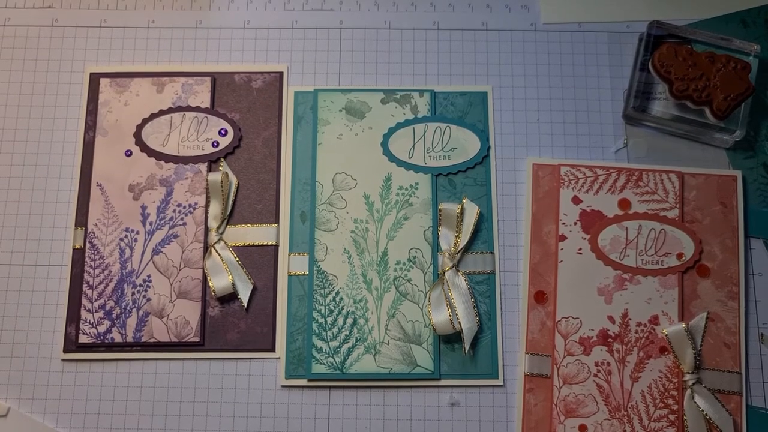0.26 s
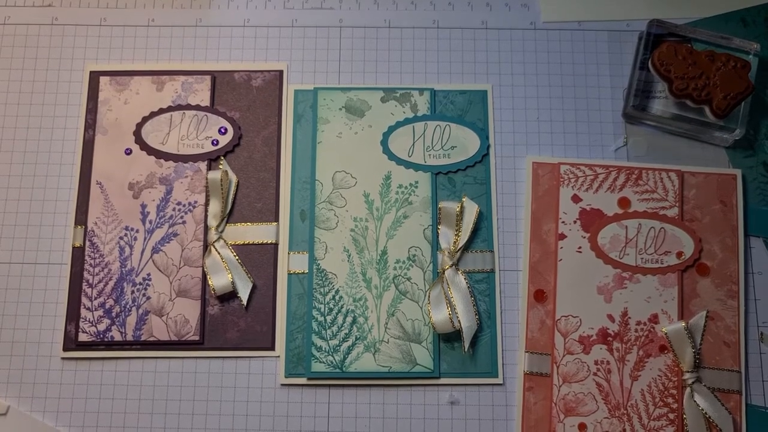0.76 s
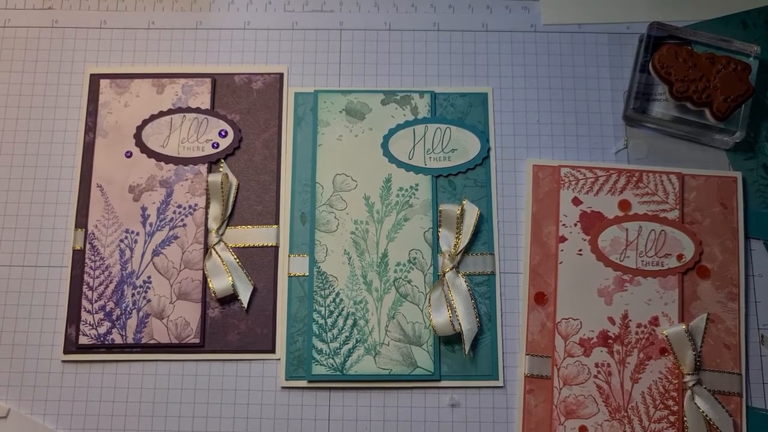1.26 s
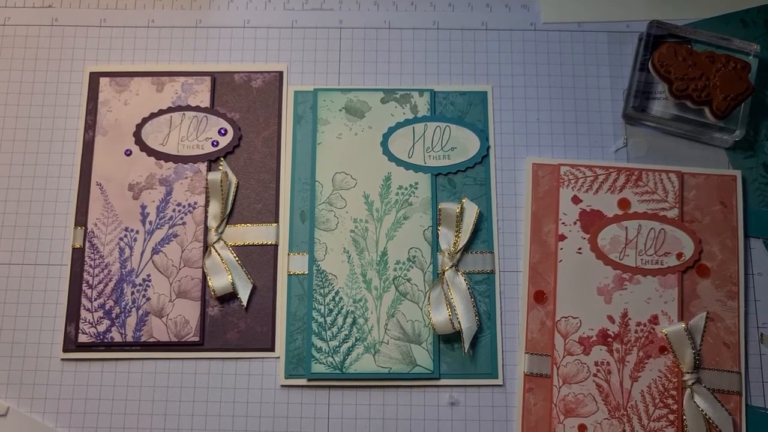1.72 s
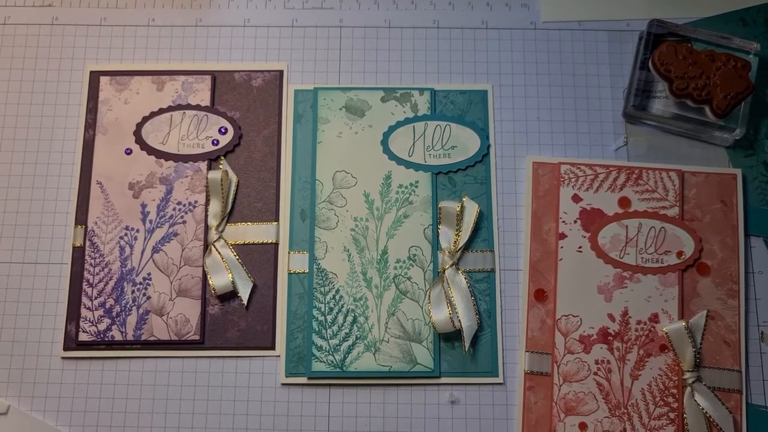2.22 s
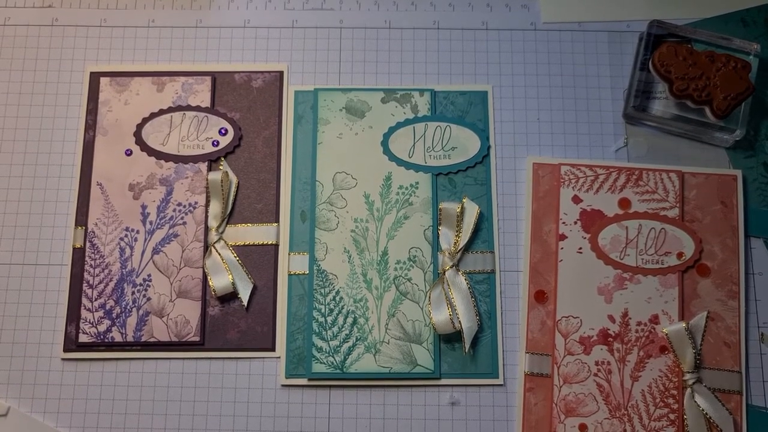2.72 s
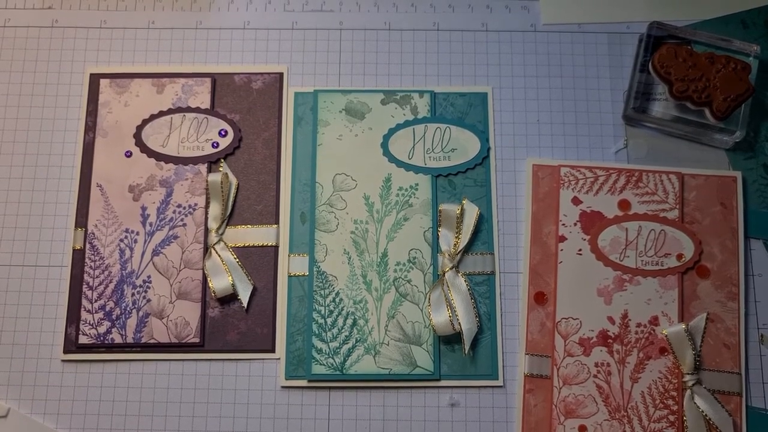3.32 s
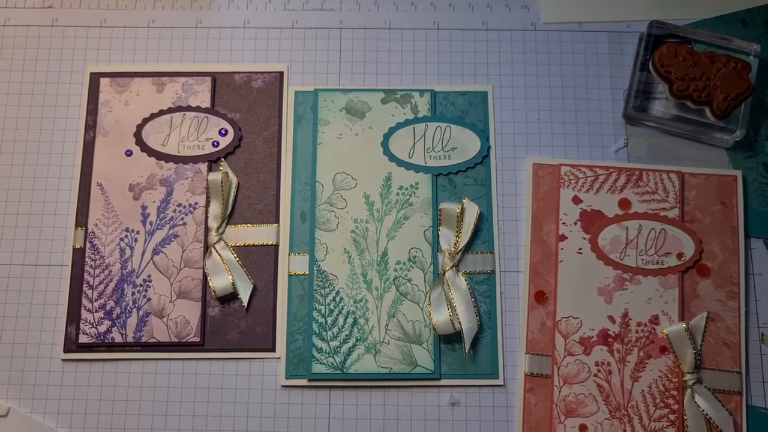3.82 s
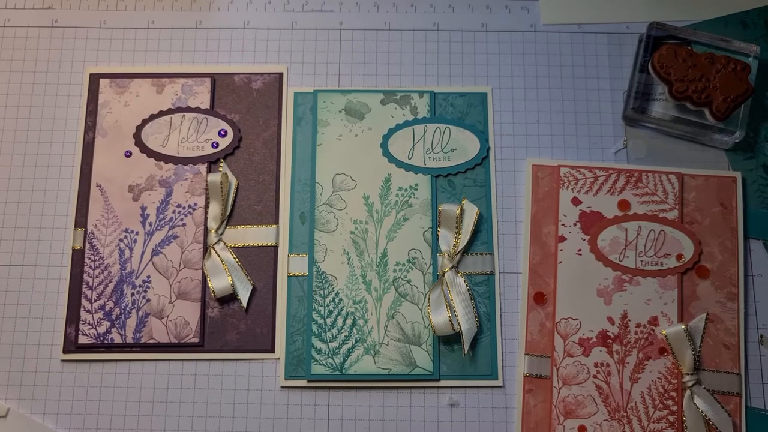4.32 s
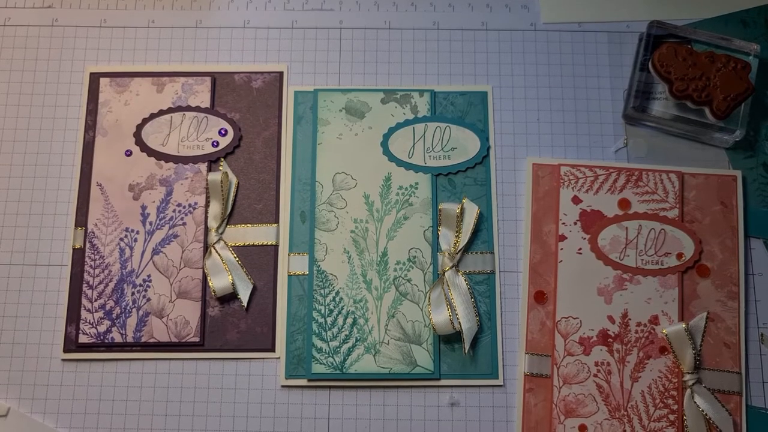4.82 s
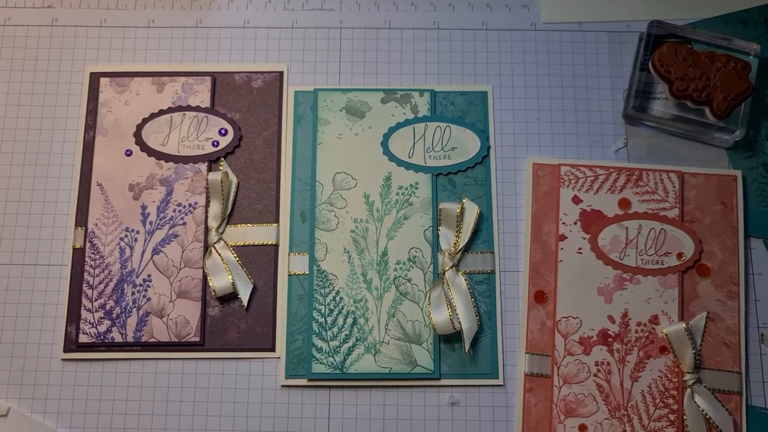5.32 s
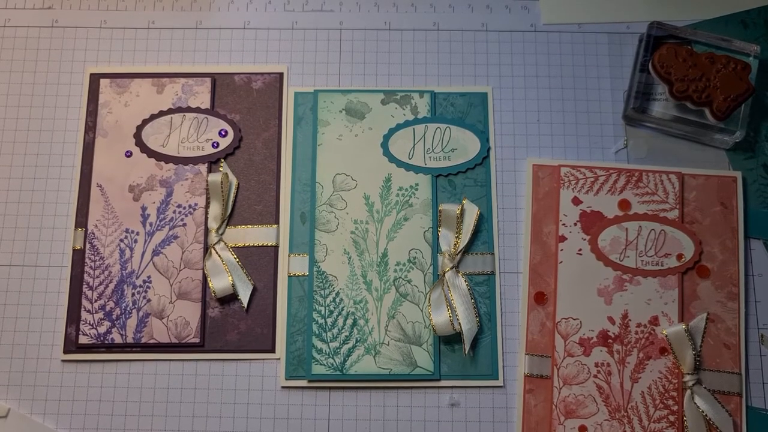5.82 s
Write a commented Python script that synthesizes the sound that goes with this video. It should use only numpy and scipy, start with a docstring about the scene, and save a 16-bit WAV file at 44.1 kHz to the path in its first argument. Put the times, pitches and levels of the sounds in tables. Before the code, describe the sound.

In a small room with a faint low hum, craft supplies are handled close to two microphones, slightly left of centre. From 0 to 1.1 seconds, light scrapes, plastic clicks and cardboard knocks come in loose clusters, strongest near 0.5 and 0.9, with soft hollow taps near 0.8 and 1.0. It is nearly quiet until 1.9, then small clicks and bumps gather around 2.2. From 2.8 a box drags and thumps, with firmer knocks at 3.1 and 3.4 and a sharp, hollow double pock with clatter at 3.6 to 3.7. After a lull, a short rising card squeak comes near 4.4, then taps and rubbing. At 4.9 a heavy tumbling thud hits, the loudest moment, with ringing plastic and a low dragging scrape. More clacks follow at 5.2; a bright, snappy clatter bursts at 5.6, then crinkling and small knocks until 6 seconds.

```python
"""Rummaging through craft supplies

In a small room, boxes knock and drag, a hollow container is tapped, thin plastic cases click and packets
crinkle; near the end things tumble down and clatter. Blows are decaying modes with shaped noise bursts,
sliding is a rain of tiny slips through shaped filters, a card squeaks as narrow noise, and a soft hum lies
below. Two microphones hear the handling a little from the left, with scattered reflections."""
import sys
import numpy as np
from scipy import signal
from scipy.fft import rfft, irfft
from scipy.io import wavfile
from scipy.ndimage import uniform_filter1d

SR = 44100
rng = np.random.default_rng(int(sys.argv[2]) if len(sys.argv) > 2 else 0)


def log_audio(samples):
    """Write samples as a 16-bit WAV file to the path given in sys.argv[1]."""
    # one column per channel
    frames = np.atleast_2d(samples).T
    # limit to full scale, then quantise
    limited = np.clip(frames, -1, 1)
    pcm = np.round(limited * 32767).astype(np.int16)
    wavfile.write(sys.argv[1], SR, pcm)


N = 267246
TIME = np.arange(N) / SR  # seconds
HIT_SIZE, STROKE_SIZE = 12288, 32768  # samples given to one hit and to one sliding stroke
HIT_TIME = TIME[:HIT_SIZE]


def undb(db):
    """Decibels to gain."""
    return 10 ** (np.asarray(db) / 20)


def unit(x):
    """Scale to rms 1."""
    return x / np.sqrt(np.mean(x ** 2) + 1e-20)


def on_log_axis(points, size):
    """Read (Hz, value) points at the bins of a transform, along a log frequency axis."""
    hz, value = np.transpose(points)
    bin_hz = np.arange(size // 2 + 1) * SR / size
    return np.interp(np.log(bin_hz + 1), np.log(hz), value)


def colour(x, points):
    """Give a steady sound a spectrum."""
    return irfft(rfft(x) * undb(on_log_axis(points, N)), N)


def response(points, size=2048):
    """Minimum-phase impulse response with a given spectrum, by folding its cepstrum."""
    cepstrum = irfft(np.log(undb(on_log_axis(points, size))))
    cepstrum[1:size // 2] *= 2
    cepstrum[size // 2 + 1:] = 0
    return irfft(np.exp(rfft(cepstrum)))


def through(x, body):
    """Pass a sound through an impulse response, keeping its length."""
    return signal.fftconvolve(x, body)[:len(x)]


def hardened(points, hardness_db):
    """Impulse response tilted above 4500 Hz: hard contacts gain top octaves, soft ones lose them."""
    slope_db = np.clip(1.17 * (hardness_db + 7.0), -7, 3)  # per octave
    tilted = [(hz, db + slope_db * max(np.log2(hz / 4500), 0)) for hz, db in points]
    return response(tilted, size=1024)


def fade(t, t60):
    """Exponential decay, 60 dB down after t60."""
    return np.exp(-np.log(1000) * t / t60)


def ring(hz, t60, rise_s):
    """One struck mode that swells while the contact lasts."""
    swell = 1 - np.exp(-HIT_TIME / rise_s)
    return np.sin(2 * np.pi * hz * HIT_TIME) * fade(HIT_TIME, t60) * swell


def burst(body, t60, crack, rise_s):
    """A contact crack and the crowd of close modes behind it: decaying noise heard through a body."""
    decay = fade(HIT_TIME, t60) + crack * fade(HIT_TIME, 0.0033)
    envelope = decay * (1 - np.exp(-HIT_TIME / rise_s))
    return through(rng.standard_normal(HIT_SIZE) * envelope, body)


def attack_level(x, db, size=750):
    """Set the rms level of the first moments of a hit."""
    return x * undb(db) / np.sqrt(np.mean(x[..., :size] ** 2) + 1e-20)


def add(track, s, x):
    """Mix a stereo sound into the track at time s, trimmed at both ends."""
    i = int(s * SR)
    x = x[:, max(-i, 0):max(N - i, 0)]
    track[:, max(i, 0):max(i, 0) + x.shape[1]] += x


def walk(rate, size=N):
    """Random wandering in straight lines between knots of spread 0.98, rate knots per second."""
    knots = rng.standard_normal(256)
    return 0.98 * np.interp(TIME[:size] * rate, np.arange(256), knots)


def slips(rate, spread_db):
    """Tiny stick-slip releases at random moments, a few much larger than the rest."""
    height = undb(spread_db * np.minimum(rng.exponential(size=STROKE_SIZE), 4))
    happens = rng.random(STROKE_SIZE) < rate / SR
    return happens * height * rng.choice([-1, 1], STROKE_SIZE)


def diffuse(size):
    """Spectra of sound from all sides at two microphones: alike in the bass, nearly unrelated above."""
    span_s = 0.00051  # travel time between the microphones
    hz = np.arange(size // 2 + 1) * SR / size
    likeness = np.clip(0.9 * np.sinc(2 * hz * span_s), -1, 1)
    mid, side = rfft(rng.standard_normal((2, size)))
    sides = np.array([[1], [-1]]) * side
    return (mid * np.sqrt(1 + likeness) + sides * np.sqrt(1 - likeness)) / np.sqrt(2)


def room(wet_db, early_db, early_t60, gap_s, band_step_db, blur_size=7, size=3 * HIT_SIZE // 2,
         lag_s=0.000468):
    """Return a listener: direct sound, close reflections off desk and shelves, and a tail in bands.

    Each higher band of the tail changes in level by band_step_db from the one below."""
    # Decay of the room tail. Each row: band centre in Hz, t60 in seconds.
    band_decays = [(200, 0.25), (2500, 0.31), (15000, 0.2)]
    left_db = 2  # raises the left, lowers the right
    hz, gap = np.arange(size // 2 + 1) * SR / size, int(gap_s * SR)
    # the direct sound reaches the left microphone first
    late = np.exp(-2j * np.pi * hz * lag_s)
    direct = np.array([undb(left_db) + 0 * hz, undb(-left_db) * late])
    # crossfaded bands, each full at its own centre
    shares = [on_log_axis([(f, f == centre) for f, _ in band_decays], size) for centre, _ in band_decays]

    def linger(power, t60):
        """Sound energy stored in the room drains away exponentially."""
        keep = fade(2 / SR, t60)
        return signal.lfilter([1 - keep], [1, -keep], power)

    def hear(x):
        """The echoes are too many to tell apart: they keep the sound's colour and scatter its phase."""
        spectrum = rfft(x, size)
        power = np.pad(x ** 2, (gap, size))[:size] + 1e-30
        blurred = uniform_filter1d(abs(spectrum) ** 2, size=blur_size)
        field = diffuse(size) * unit(np.sqrt(abs(blurred)))
        early = undb(early_db) ** 2 * linger(power, early_t60)
        heard = irfft(spectrum * direct)
        for band, (share, (_, t60)) in enumerate(zip(shares, band_decays)):
            tail = undb(wet_db + band * band_step_db) ** 2 * linger(power, t60)
            heard += irfft(field * share) * np.sqrt(early + tail)
        return heard
    return hear


def room_tone():
    """The quiet hum of the room: noise from all sides, strongest near 100 Hz, wavering slightly."""
    # Colour of the hum. Each row: frequency in Hz, relative level in dB per Hz.
    hum_colour = [(20, -9), (50, -6), (100, 8.5), (150, -10), (350, -6), (700, -13), (2000, -18.5),
                  (6000, -25.5), (12000, -35.5), (16000, -29)]
    hum = unit(colour(irfft(diffuse(N), N), hum_colour))
    return hum * undb(-61 + 0.44 * walk(rate=8.0))


def squeak():
    """Friction noise in two bending resonances that rise as the free length of card shortens."""
    # Path of a card sliding along an edge. Each row: time in seconds, upper resonance in Hz, level in dB.
    glide = [(4.32, 2650, -83.5), (4.389, 3090, -59.5), (4.44, 3150, -67), (4.52, 3390, -67),
             (4.62, 3530, -82)]
    s, hz, db = np.transpose(glide)
    phase = 2 * np.pi * np.cumsum(np.interp(TIME, s, hz)) / SR
    narrow = signal.butter(2, 180, fs=SR, output="sos")
    upper = unit(signal.sosfilt(narrow, rng.standard_normal((2, N))))
    lower = unit(signal.sosfilt(narrow, rng.standard_normal((2, N))))
    modes = upper * np.sin(phase) + undb(4.5) * lower * np.sin(0.58 * phase)
    return np.sqrt(2) * modes * np.interp(TIME, s, undb(db), left=0, right=0)


def taps():
    """A small hollow container held nearer the centre: damped modes and a crack make a short dry pock."""
    # Taps. Each row: start in seconds, attack level in dB before the room.
    tap_list = [(0.79, -33.5), (1.032, -38), (3.204, -31.5), (3.569, -35.5), (3.616, -17), (3.65, -21.5),
                (4.426, -43), (4.607, -29), (5.71, -30), (5.899, -36.5)]
    # What the container rings with. Each row: nominal frequency in Hz, relative level in dB, t60 in seconds.
    hollow_modes = [(594, -5, 0.027), (1112, 7, 0.11), (1096, -5.5, 0.012), (1696, -7.5, 0.049),
                    (2076, -24, 0.014)]
    # Colour of its contact crack. Each row: frequency in Hz, relative level in dB per Hz.
    crack_colour = [(200, -25), (600, -8), (1100, 5), (1650, -12), (2400, -21), (6000, -44.5)]
    track, shell = np.zeros((2, N)), response(crack_colour)
    hear = room(wet_db=-16.5, early_db=-5.5, early_t60=0.025, gap_s=0.0013, band_step_db=2.5,
                blur_size=81, lag_s=0.0003)
    for s, db in tap_list:
        grip = 1 + 0.015 * rng.standard_normal()  # shifts the pitch of each tap a little
        modes = sum(undb(mode_db) * ring(hz * grip, t60, rise_s=0.00073)
                    for hz, mode_db, t60 in hollow_modes)
        crack = burst(shell, t60=0.035, crack=3, rise_s=0.0002)
        add(track, s, hear(attack_level(unit(modes) + unit(crack), db)))
    return track


def clicks():
    """Edges of thin plastic cases meet: a bright snap, a dense short ring and a few stronger modes."""
    # Clicks. Each row: start in seconds, gain of the ringing body in dB, attack level of the snap in dB,
    # base t60 in seconds.
    click_list = [(0.032, -49.5, -58, 0.017), (0.282, -55.5, -66, 0.038), (0.456, -38, -57, 0.037),
                  (0.72, -37.5, -49.5, .14), (0.868, -34.5, -49.5, 0.087), (0.951, -53, -53, 0.096),
                  (0.999, -49, -60, 0.011), (1.097, -81.5, -66, 0.088), (1.325, -57, -68.5, 0.033),
                  (1.512, -58.5, -79, 0.1), (1.69, -45, -52.5, 0.082), (1.797, -64, -71, 0.039),
                  (2.055, -48, -64, 0.069), (2.137, -49.5, -57.5, 0.18), (2.192, -44.5, -50.5, 0.078),
                  (2.212, -39, -52.5, 0.13), (2.237, -42, -52.5, 0.16), (2.508, -52, -67.5, 0.08),
                  (2.609, -57.5, -67.5, 0.033), (2.805, -36.5, -51.5, 0.15), (2.926, -43, -54.5, 0.038),
                  (2.996, -64, -56, .06), (3.025, -34.5, -45.5, 0.074), (3.118, -39, -49, .07),
                  (3.159, -48.5, -55, 0.028), (3.357, -30.5, -42, 0.15), (3.422, -56, -42.5, 0.0061),
                  (3.470, -38.5, -47.5, 0.045), (3.606, -31, -45, 0.0086), (3.617, -27.5, -39.5, 0.024),
                  (3.648, -38, -45, 0.093), (3.672, -32, -36.5, 0.018), (3.682, -28.5, -43, 0.094),
                  (3.704, -32.5, -40, .05), (3.97, -55, -61, .045), (4.178, -48.5, -77, 0.052),
                  (4.593, -42.5, -51.5, .1), (4.682, -31.5, -45.5, 0.024), (4.882, -22.5, -34, 0.27),
                  (4.91, -24, -51, 0.066), (4.934, -36, -52, .07), (5.033, -34.5, -42, 0.035),
                  (5.126, -52, -44.5, 0.33), (5.178, -23.5, -32.5, 0.034), (5.186, -33, -41.5, 0.14),
                  (5.578, -23.5, -25, 0.13), (5.587, -24, -51, .2), (5.607, -62, -31, 0.23),
                  (5.627, -35, -31.5, 0.15), (5.794, -45, -45.5, 0.22), (5.888, -38.5, -48, 0.029)]
    # What a case rings with. Each row: nominal frequency in Hz, relative level in dB before scatter.
    case_modes = [(930, -8.5), (1024, 4), (1338, -7.5), (2012, -5), (2680, -10.5)]
    # Colours of the dense ring and of the snap. Each row: frequency in Hz, relative level in dB per Hz.
    shell_colour = [(150, -40), (600, 13), (1100, -1.5), (1400, 6.5), (2000, 3.5), (3000, 0.5), (5000, -26)]
    snap_colour = [(1500, -36.5), (3000, 3), (4500, -1), (6500, -2.5), (8500, -9), (12000, -8.5),
                   (16000, -20.5)]
    scatter_db, detune = 2, 0.0084  # each click wakes and tunes the modes differently
    track, shell = np.zeros((2, N)), response(shell_colour)
    hear = room(wet_db=-1.0, early_db=3.5, early_t60=0.047, gap_s=0.00062, band_step_db=0.7, blur_size=41)
    for s, db, treble_db, t60 in click_list:
        modes = np.zeros(HIT_SIZE)
        for hz, mode_db in case_modes:
            wake, shift = rng.standard_normal(2)
            mode = ring(hz * (1 + detune * shift), 0.81 * t60, rise_s=0.000074)
            modes += undb(mode_db + scatter_db * wake) * mode
        dense = burst(shell, t60, crack=0.91, rise_s=0.00047)
        body = attack_level(dense, -5.05) + attack_level(modes, -6.0)
        # rise_s: the snap swells in over a few milliseconds
        snap = burst(hardened(snap_colour, treble_db - db), 0.69 * t60, crack=17.0, rise_s=0.003)
        add(track, s, hear(undb(db) * body + attack_level(snap, treble_db)))
    return track


def hand_speed(length):
    """Level of one stroke: quick attack, slightly growing push, coasting to rest, all in a jerky hand."""
    attack_s, growth_db_per_s, release_t60_s = 0.01, 1.5, 0.21
    t = TIME[:STROKE_SIZE]
    shape = np.minimum(t / attack_s, 1) * fade(np.maximum(t - length, 0), release_t60_s)
    jerk_db = 3 * walk(rate=67.2, size=STROKE_SIZE)
    return shape * undb(jerk_db + growth_db_per_s * t)


def handling():
    """Strokes of tiny slips: a box drags in jerks, card rubs on card, packets crinkle, edges catch."""
    # Things pushed aside or pulled out. Each row: start in seconds, length of the push in seconds, then
    # levels in dB before hand and room of box drag, card rub and packet crinkle, and a relative bass boost
    # of the drag in dB, from the weight on the desk.
    stroke_list = [(-0.02, 0.064, -56, -59.5, -66.5, 5), (0.184, 0.14, -55, -67, -75, 4),
                   (0.279, 0.034, -44, -62, -85, 5), (0.489, 0.077, -43.5, -45, -64, -9),
                   (0.572, 0.012, -48.5, -46, -66, -15), (0.756, 0.029, -44, -52.5, -64.5, -21),
                   (0.89, 0.15, -56, -58.5, -64.5, 10), (1.253, 0.089, -56, -70.5, -88, 10),
                   (1.718, 0.042, -57.5, -72, -83, 5.5), (1.928, 0.14, -52, -64.5, -73, -5),
                   (2.187, 0.043, -43, -76, -76, 2), (2.458, 0.12, -64, -76, -89, 6),
                   (2.828, 0.31, -38, -50, -62.5, 4), (3.191, 0.19, -48, -54, -65.5, 3),
                   (3.378, 0.26, -42.5, -50, -60.5, 4.5), (3.638, 0.13, -36, -43.5, -49.5, -9),
                   (3.775, 0.14, -52, -57.5, -63, 6), (3.977, 0.084, -60.5, -65, -64.5, 6),
                   (4.145, 0.036, -61.5, -58, -62, -5), (4.369, 0.048, -53.5, -51.5, -60, 6),
                   (4.528, 0.19, -44.5, -50, -59, -3), (4.785, 0.11, -41, -51, -62.5, -6),
                   (4.941, 0.42, -41.5, -46.5, -53, 10), (5.421, 0.025, -56, -54, -57, -2),
                   (5.539, 0.046, -52.5, -51, -47.5, 1), (5.598, 0.18, -41.5, -41.5, -47.5, 17),
                   (5.834, 0.11, -40, -38.5, -48, 4.5), (6.021, 0.068, -47, -51.5, -58.5, 9)]
    # Colours of box, card and packet. Each row: frequency in Hz, relative level in dB per Hz.
    drag_colour = [(25, -55.5), (45, -19), (75, -3.5), (150, -8.5), (240, 1.5), (370, 1.5), (540, -1),
                   (800, -22), (1400, -57)]
    rub_colour = [(400, -16), (750, 7.5), (1080, 7), (1400, 7.5), (2000, 1), (3000, -3), (4200, -17),
                  (7000, -49)]
    crinkle_colour = [(1500, -22.5), (3000, 5.5), (4500, -0.5), (6500, -4), (8500, -9), (12000, -10),
                      (16000, -22)]
    bass_hz = 200  # the weight acts below this
    track, card = np.zeros((2, N)), response(rub_colour)
    hear = room(wet_db=-2.5, early_db=-1.0, early_t60=0.029, gap_s=0.0021, band_step_db=2.9,
                size=STROKE_SIZE)
    for s, length, drag_db, rub_db, crinkle_db, weight_db in stroke_list:
        jerks, fibres, creases = slips(900, 1.5), slips(3500, 2.5), slips(3500, 3)
        # now and then a sliding edge catches and ticks
        catches = undb(18) * slips(rate=37, spread_db=4)
        box = response([(hz, db + weight_db * (hz < bass_hz)) for hz, db in drag_colour])
        packet = hardened(crinkle_colour, crinkle_db - rub_db + 0.5)
        drag = unit(through(jerks, box)) * undb(drag_db)
        rub = unit(through(fibres + catches, card)) * undb(rub_db)
        crinkle = unit(through(creases + catches, packet)) * undb(crinkle_db)
        add(track, s, hear(hand_speed(length) * (drag + rub + crinkle)))
    return track


def knocks():
    """A box bumps or lands: it rings a wall, thuds into what lies below and shakes the furniture."""
    # Blows. Each row: start in seconds, wall level in dB and thud level in dB (attacks before the room),
    # pitch of the struck wall in Hz, t60 of the wall in seconds.
    knock_list = [(0.184, -50, -60, 337, 0.13), (0.461, -27.5, -70, 598, 0.08),
                  (0.477, -31.5, -56, 358, 0.087), (0.719, -29.5, -75, 438, 0.081),
                  (0.87, -21, -65, 357, 0.022), (0.879, -29.5, -63, 630, 0.082),
                  (1.002, -50, -55.5, 630, 0.03), (1.912, -44, -77, 340, 0.091),
                  (1.952, -43.5, -63, 369, 0.17), (2.067, -36.5, -45, 283, 0.16),
                  (2.22, -33, -37, 361.7, 0.18), (2.291, -42.5, -42.5, 350, 0.021),
                  (2.616, -53.5, -77, 352, 0.088), (2.81, -26.5, -26.5, 197, 0.066),
                  (2.823, -27.5, -30, 235, 0.08), (2.926, -42, -42, 342, 0.16),
                  (3.035, -28, -37, 345.4, 0.29), (3.117, -25.5, -28.5, 249, 0.049),
                  (3.121, -26.5, -48, 540, 0.029), (3.145, -32.5, -32.5, 264, 0.077),
                  (3.37, -19, -23.5, 382.4, 0.079), (3.391, -28, -28, 350, 0.078),
                  (3.649, -26, -38, 530, 0.15), (3.673, -26.5, -32, 374, 0.16),
                  (3.73, -25.5, -29.5, 334, 0.076), (3.744, -28, -32, 345, 0.045),
                  (3.891, -38, -69.5, 482, 0.031), (3.93, -47, -69, 438, 0.07),
                  (4.189, -42, -50.5, 365, 0.069), (4.276, -47.5, -69, 383.6, 0.2),
                  (4.425, -35, -52, 530, 0.042), (4.594, -30, -69, 336, 0.033),
                  (4.606, -24, -56, 400, 0.053), (4.685, -26.5, -70, 392, 0.058),
                  (4.796, -38.5, -70, 394, 0.29), (4.888, -13.5, -14.5, 220, 0.064),
                  (4.9, -11.5, -15, 141.5, .08), (4.914, -13, -34, 385, 0.085),
                  (4.933, -17.5, -38, 514, 0.011), (4.946, -19, -31, 246, 0.042),
                  (5.037, -59, -39, 390, 0.064), (5.143, -35, -41, 380, 0.054),
                  (5.179, -24.5, -30, 153.3, 0.085), (5.246, -33, -35, 157, 0.1),
                  (5.304, -38, -53, 148, 0.026), (5.369, -34, -66, 525, 0.036),
                  (5.425, -43.5, -60, 390, .13), (5.579, -21, -26, 371, 0.027),
                  (5.586, -30, -44, 700, 0.05), (5.713, -38, -42.5, 403, 0.044),
                  (5.874, -38, -49, 413, 0.068), (5.89, -33.5, -43, 790, 0.067)]
    # Furniture modes woken by every blow. Each row: frequency in Hz, relative level in dB, t60 in seconds.
    furniture_modes = [(145.4, 6, 0.41), (220, 13, 0.2), (334, -53, 0.22), (376, 6, 0.42), (530, -17, 0.22),
                       (577, 18, .25), (680, -3, 0.37)]
    # Colour of the thud. Each row: frequency in Hz, relative level in dB per Hz.
    thud_colour = [(18, -40), (45, -25.5), (70, -11), (100, -20), (140, -1), (200, -5), (300, -4.5),
                   (700, -84.5)]
    # Other modes of a box wall. Each row: multiple of its pitch, relative level in dB per Hz.
    wall_colour = [(.1, -38.5), (.5, -9), (1, 5), (1.6, -0.5), (2.7, -10), (5, -16.5), (14, -87)]
    track, below = np.zeros((2, N)), response(thud_colour)
    hear = room(wet_db=-6, early_db=-1, early_t60=0.081, gap_s=0.00086, band_step_db=-7.5)
    for s, db, thud_db, hz, t60 in knock_list:
        card = response([(hz * multiple, gain_db) for multiple, gain_db in wall_colour])
        contact_s = 0.5 / hz  # small stiff walls are struck more briefly
        pitch = ring(hz, t60, contact_s)
        dense = burst(card, t60, crack=10.2, rise_s=contact_s / 2)
        wall = attack_level(pitch, -0.039) + attack_level(dense, -5.6)  # sets their balance
        thud = burst(below, 0.57 * t60, crack=1.0, rise_s=0.00071)
        add(track, s, hear(attack_level(wall, db) + attack_level(thud, thud_db, size=1100)))
    modes = sum(undb(db) * ring(hz, t60, rise_s=0.012) for hz, db, t60 in furniture_modes)
    return track + undb(-71.5) * through(track.mean(axis=0), modes)


def scene():
    """Knocks, taps, clicks, sliding and a squeak over the quiet hum of the room."""
    return knocks() + taps() + clicks() + handling() + squeak() + room_tone()


def record(dry):
    """The recorder drops the deepest rumble, rounds the highest peaks and cuts the top."""
    rumble_cut = signal.butter(2, 28, "high", fs=SR, output="sos")
    top_cut = signal.ellip(10, 0.2, 80, 16100, fs=SR, output="sos")
    rounded = 1.136 * np.tanh(signal.sosfilt(rumble_cut, dry) / 1.314)
    return signal.sosfilt(top_cut, rounded)


dry = scene()
out = record(dry)
log_audio(out)
```